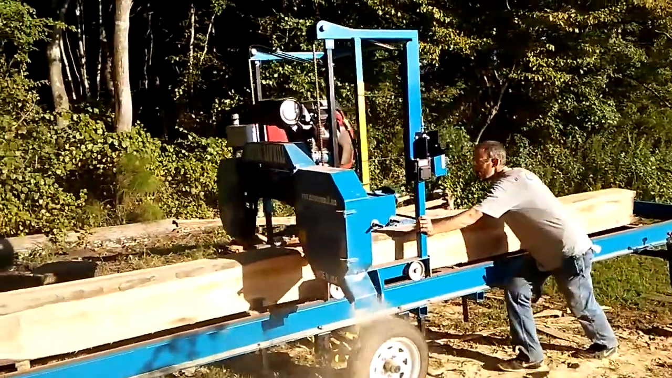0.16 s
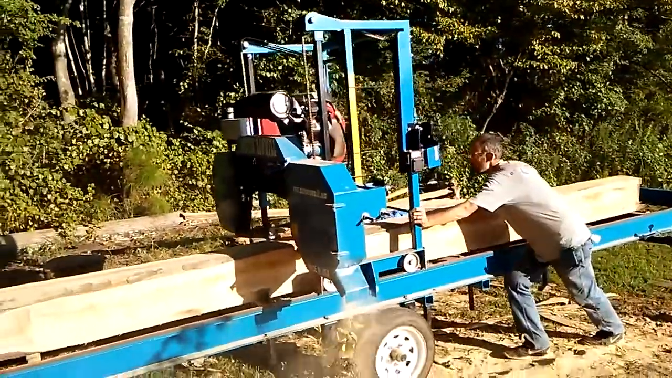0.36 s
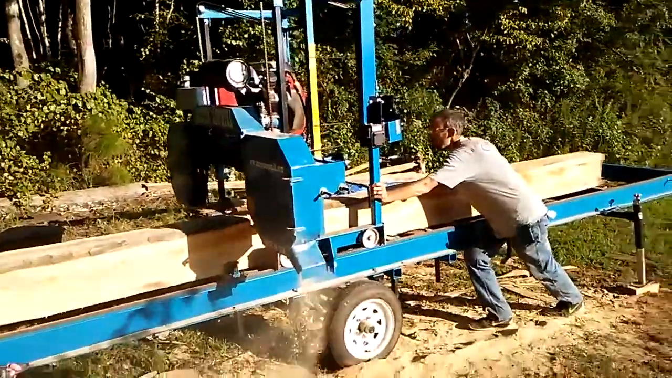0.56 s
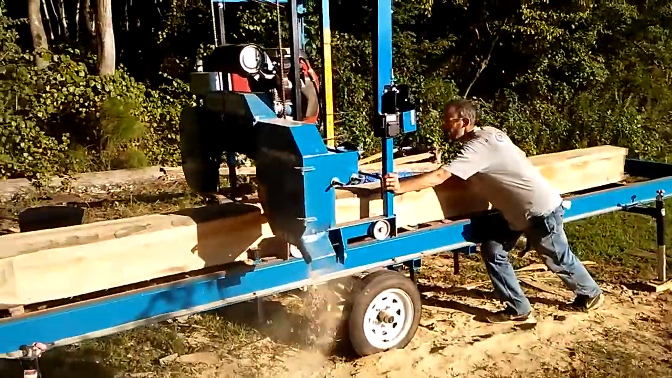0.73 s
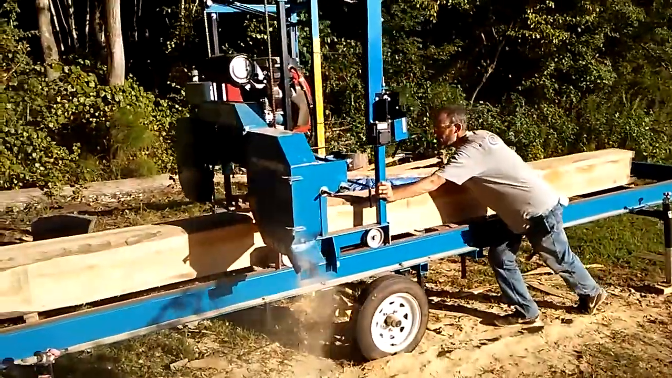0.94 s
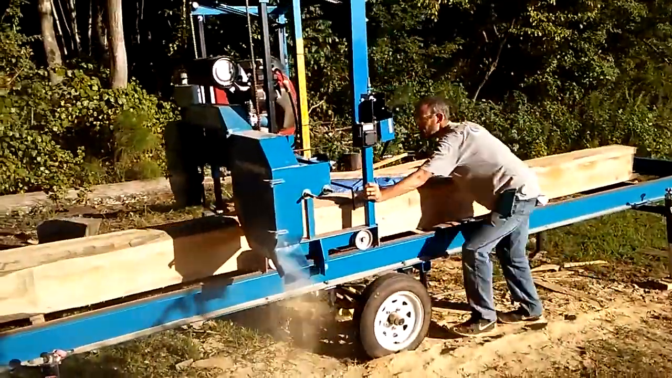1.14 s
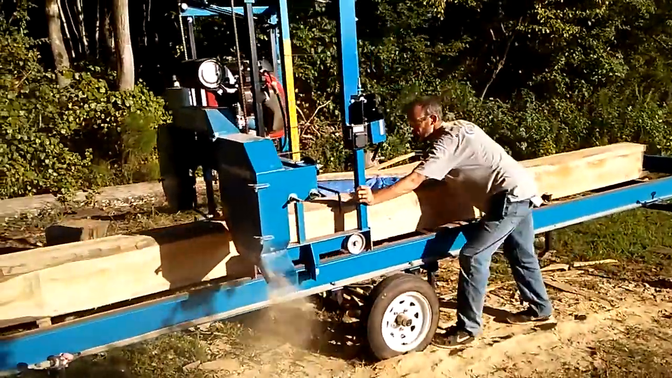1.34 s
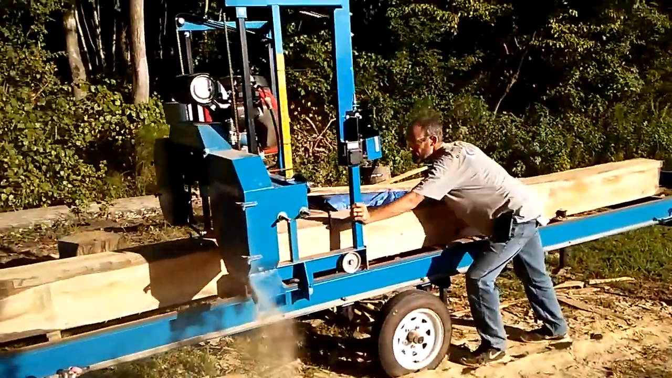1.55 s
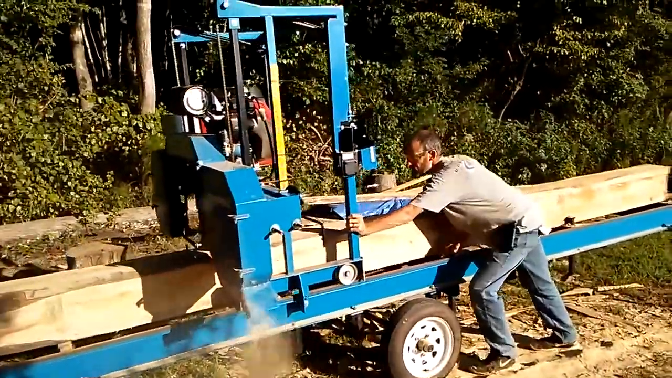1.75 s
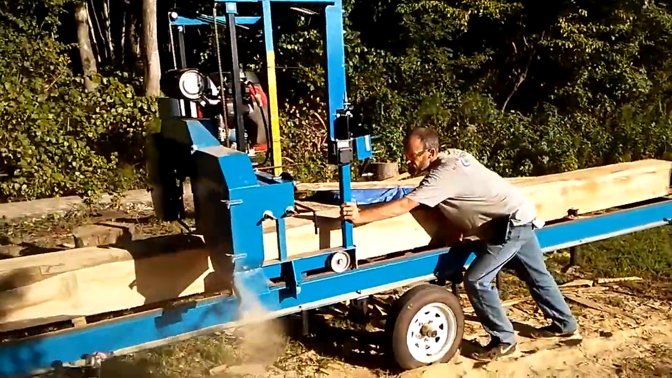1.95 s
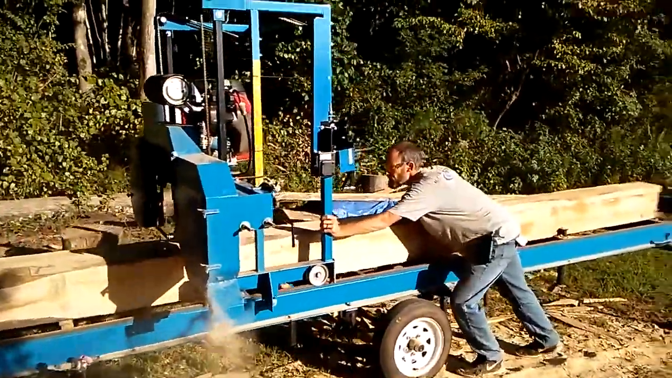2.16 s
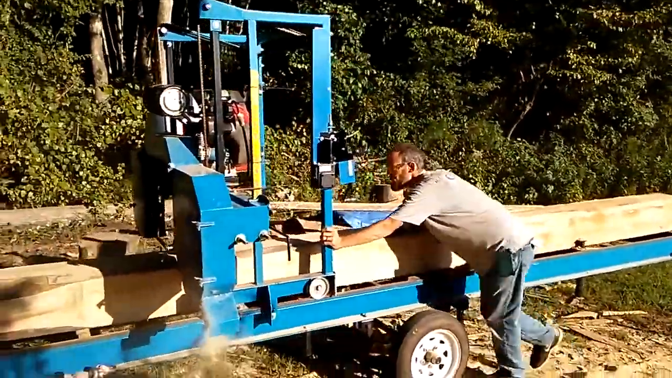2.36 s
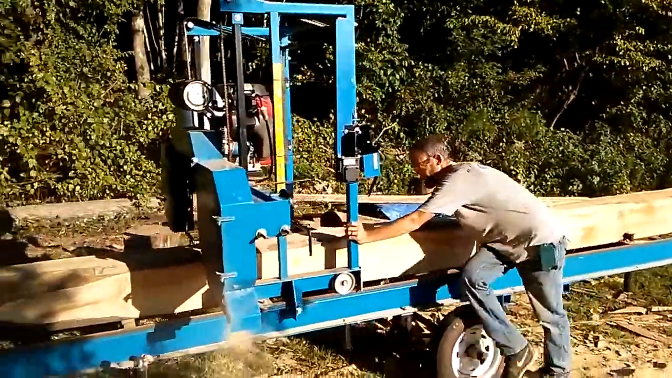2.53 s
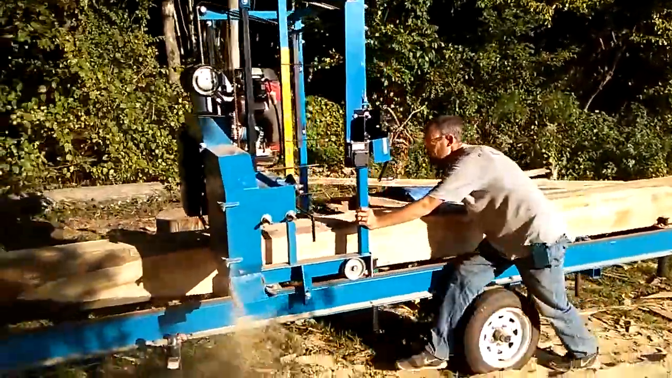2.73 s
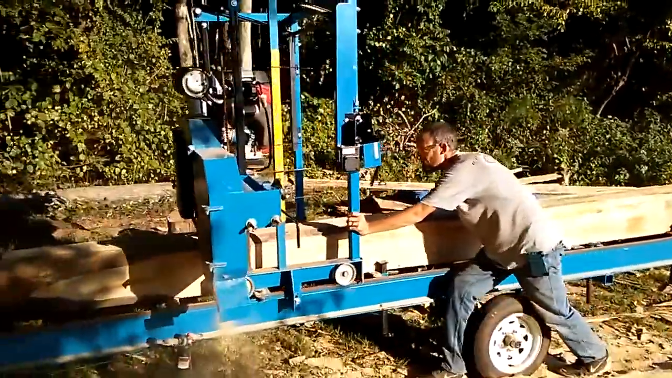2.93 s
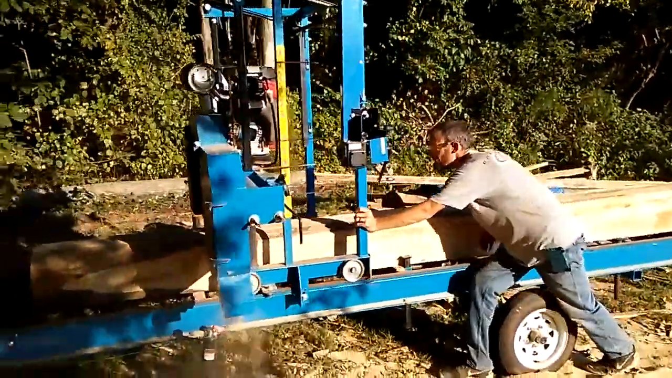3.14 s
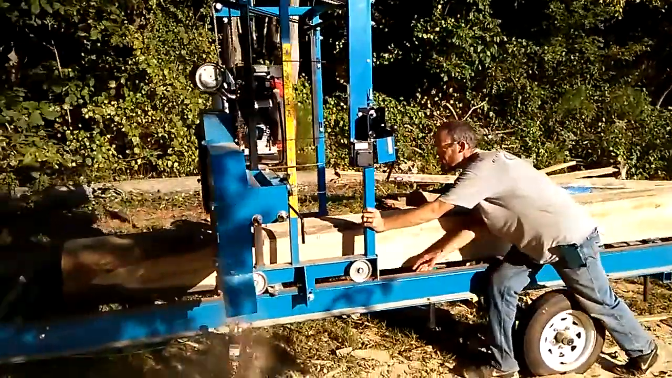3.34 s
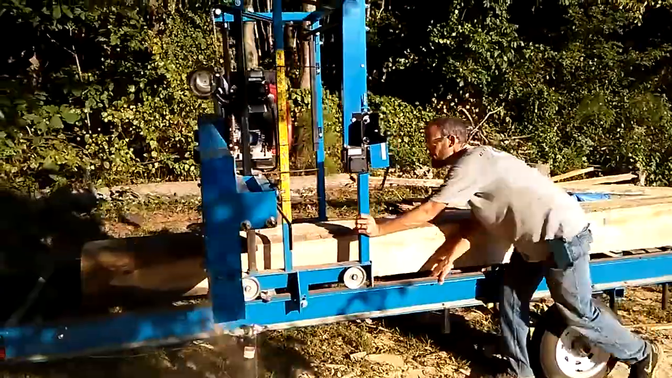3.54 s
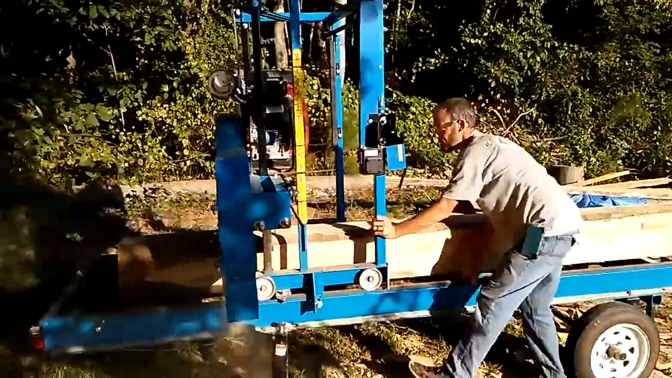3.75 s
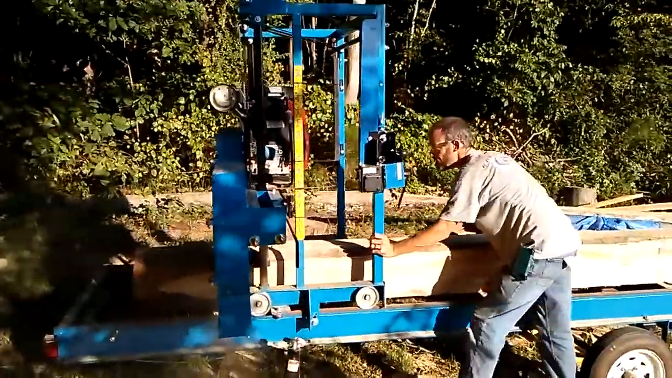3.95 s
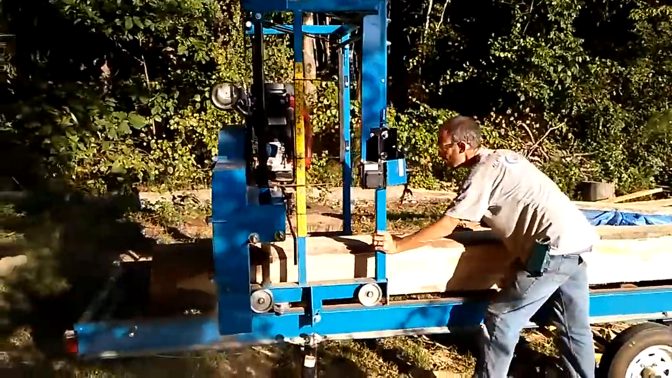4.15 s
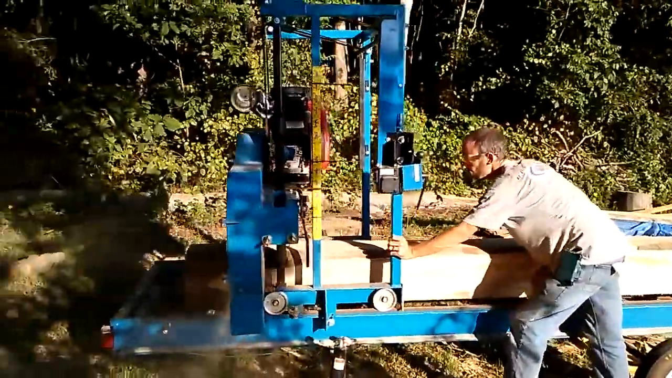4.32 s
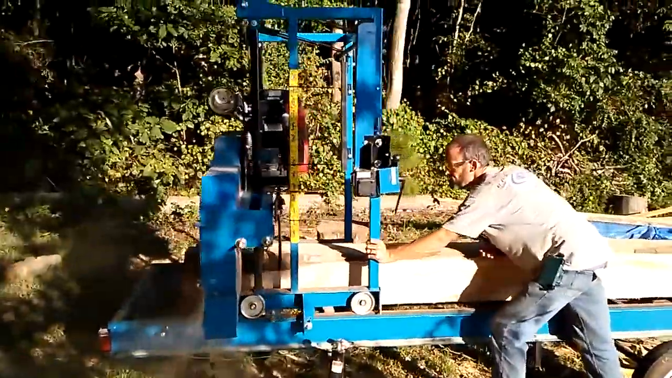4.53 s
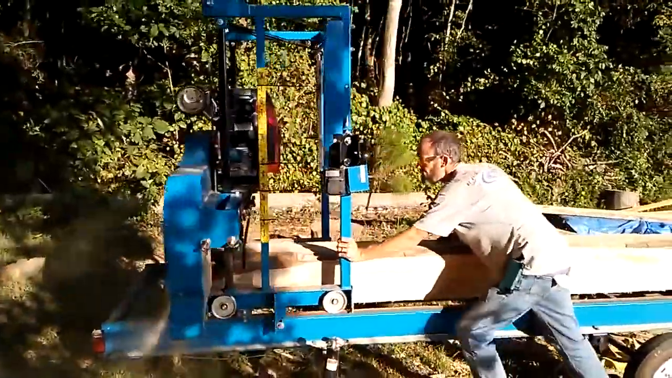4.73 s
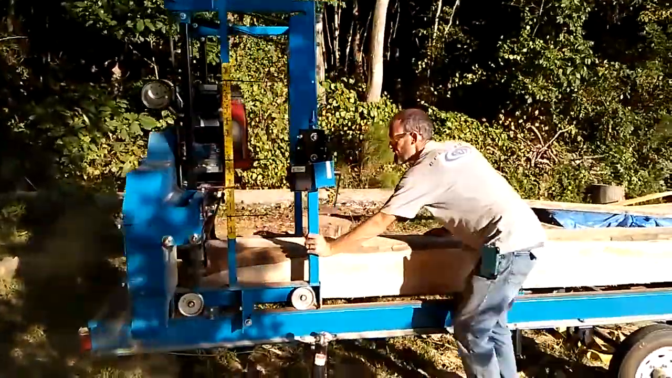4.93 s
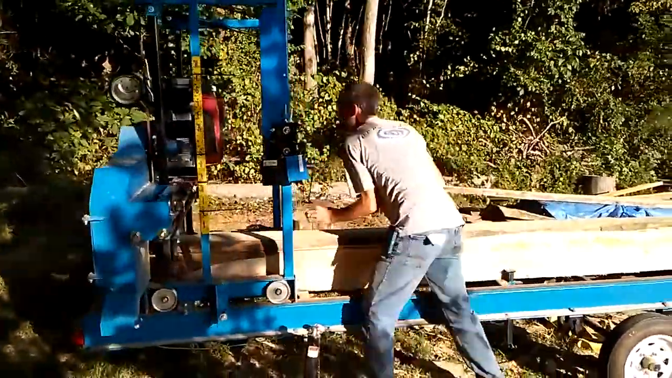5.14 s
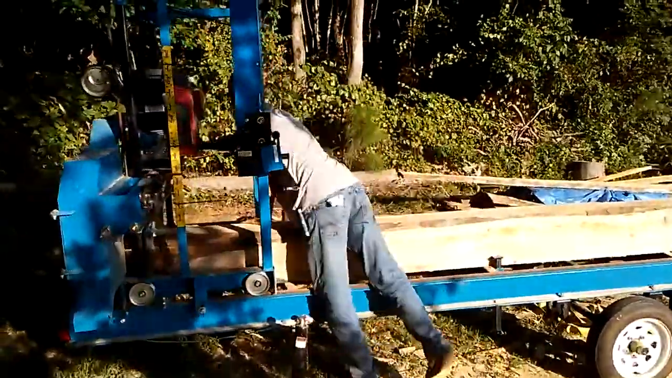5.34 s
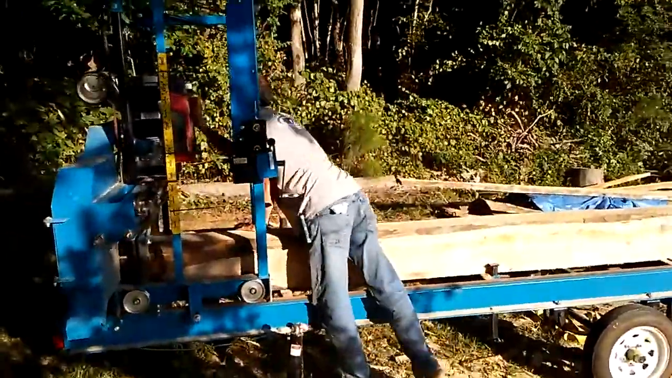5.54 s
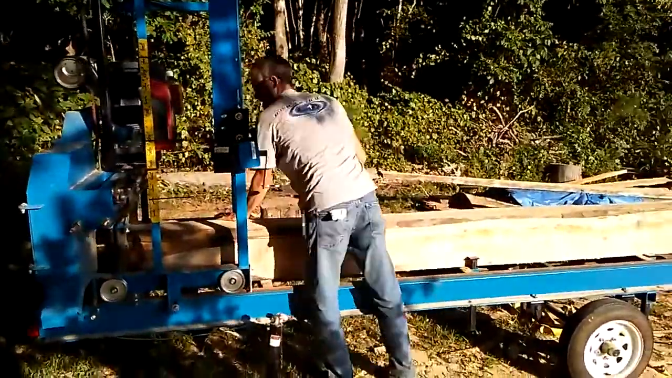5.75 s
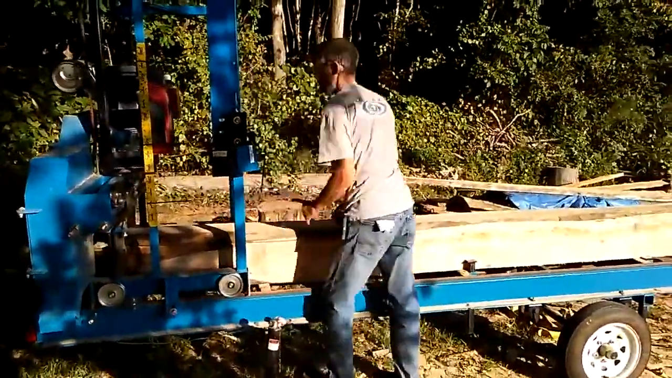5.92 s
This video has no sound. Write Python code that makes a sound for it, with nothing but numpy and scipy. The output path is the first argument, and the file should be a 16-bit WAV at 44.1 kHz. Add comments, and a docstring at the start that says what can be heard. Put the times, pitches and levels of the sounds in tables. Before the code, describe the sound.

Close to a petrol band sawmill outdoors, a loud continuous rasp of teeth in wood and a bright steely sizzle ride over a rough, droning engine. A wavering metallic whine sings through the cut. Near the end the blade leaves the log with two quick squeals, the whine stops, and the engine and rattling housing are left exposed, fading as the throttle is eased. Small microphone, thin bass.

```python
"""The rasp and sizzle of a petrol band sawmill cutting a log outdoors come first, over its droning engine.
The tooth pattern sings on overtones of about 205 Hz, made as sines and narrow resonances; all else but the
squeals is shaped noise. Just before 5 s the blade leaves the wood: the song stops, two brief squeals sound,
then the throttle is eased. Heard close by through a small microphone, with little bass and a notch at 5 kHz."""
import sys
import numpy as np
from scipy import signal
from scipy.io import wavfile
from scipy.ndimage import uniform_filter1d

SR = 44100
rng = np.random.default_rng(int(sys.argv[2]) if len(sys.argv) > 2 else 0)


def bounce(signal):
    """Save signal as a 16-bit WAV file at the path given by the first command-line argument."""
    frames = np.transpose(np.atleast_2d(signal))
    limited = np.clip(frames, -1, 1)
    pcm = np.round(limited * 32767).astype(np.int16)
    wavfile.write(sys.argv[1], SR, pcm)


N = 268260
T = np.arange(N) / SR


def amp(db):
    """Amplitude factor of a level in dB."""
    return 10 ** (np.asarray(db) / 20)


def unit(x):
    """Scale to rms 1."""
    return x / np.sqrt(np.mean(x ** 2) + 1e-20)


def column(rows, index, t=T):
    """One column of a table, drawn as straight lines between its times."""
    rows = np.asarray(rows)
    return np.interp(t, rows[:, 0], rows[:, index])


def cycle(turns):
    """Cosine that peaks once per turn."""
    return np.cos(2 * np.pi * turns)


def wander(width):
    """Slow chance of rms 1, smoothed twice over width seconds."""
    size = max(int(width * SR), 2)
    once = uniform_filter1d(rng.standard_normal(N), size)
    return unit(uniform_filter1d(once, size))


def noise(shape, later=None, share=None, patchy_db=0.5, span_hz=400, span_s=.06, size=1024, side=None):
    """Random short-time spectra of rms 1 with drifting patches; shape may blend into a later one."""
    hop = size // 4
    frames = N // hop + 5
    hz = np.fft.rfftfreq(size, 1 / SR)

    def read(points):
        point_hz, db = np.transpose(points)
        return np.interp(np.log(hz + 1), np.log(point_hz + 1), db)[:, None]

    real, imag, patches = rng.standard_normal((frames, len(hz), 3)).T
    patches = uniform_filter1d(patches, max(int(span_hz * size / SR), 1), axis=0)
    patches = unit(uniform_filter1d(patches, max(int(span_s * SR / hop), 1), axis=1))
    level = read(shape) + 0 * real
    if later:
        mix = np.clip(column(share, index=1, t=np.arange(frames) * hop / SR), 0, 1)
        level = (1 - mix) * level + mix * read(later)
    gain = amp(level) * (hz > .9 * shape[0][0])[:, None]
    gain = gain / np.sqrt((gain ** 2).sum(axis=0)) * amp(patchy_db * patches)
    spectra = (gain * (real + 1j * imag))[None]
    if side:
        side_real, side_imag, gaps = rng.standard_normal((frames, len(hz), 3)).T
        gaps = uniform_filter1d(gaps, 16, axis=0)
        gaps = unit(uniform_filter1d(gaps, 6, axis=1))  # the width comes and goes
        apart = gain * amp(read(side) + 6.9 * gaps) * (side_real + 1j * side_imag)
        spectra = np.array([spectra[0] + apart, spectra[0] - apart])
    out = signal.istft(spectra, nperseg=size, noverlap=size - hop)[1][:, :N]
    return out / np.sqrt(np.mean(out.mean(axis=0) ** 2))


def resonate(hz, width):
    """Noise through a narrow resonance that follows hz: smooth complex noise shifted up; rms 1."""
    decay = np.exp(-np.pi * width / SR)
    white = rng.standard_normal(N) + 1j * rng.standard_normal(N)
    slow = signal.lfilter([1 - decay], [1, -decay], white)
    carrier = np.exp(2j * np.pi * np.cumsum(hz * np.ones(N)) / SR)
    return unit((slow * carrier).real)


def engine_firings():
    """Running count of firings, with an uneven rate around 59.9 Hz."""
    return np.cumsum(59.9 * (1 + 0.1507 * wander(0.0318))) / SR


# Engine levels. Each row: time in seconds, exhaust in dB, casing in dB, rumble in dB.
ENGINE_LEVELS = [(0, -27.5, -26.5, -51), (.6, -26.5, -22.5, -48), (1.4, -28, -25, -51),
                 (1.9, -25, -24.5, -50), (2.4, -26.5, -26, -50), (3.2, -25, -22, -50),
                 (4.3, -26, -25.5, -54), (4.9, -27, -22.5, -49), (5.17, -24.5, -19, -46.5),
                 (5.45, -25.5, -21, -49), (5.62, -26.5, -20.5, -37), (5.8, -30, -24, -45),
                 (6.08, -35, -28.5, -56)]
# Low engine rumble spectrum. Each row: frequency in Hz, relative density in dB.
RUMBLE_SPECTRUM = [(12, -37), (20, 0), (54, 3), (70, 8.5), (107, -9), (125, -7), (160, -32), (280, -120)]


def engine_rumble(shake):
    """Low engine noise that wavers with the frame."""
    level_db = column(ENGINE_LEVELS, index=3) + 1.7 * wander(.04) + .8 * shake
    return amp(level_db) * noise(RUMBLE_SPECTRUM, size=4096, span_hz=30, span_s=.15)


# Blade leaving the log. Each row: time in seconds, share (0-1) of the free-running spectra.
OUT_OF_WOOD = [(0, 0), (4.88, 0.35), (5.0, 0.7), (6.08, 0.73)]
# Exhaust spectra, in the wood and free. Each row: frequency in Hz, relative density in dB.
EXHAUST_CUTTING = [(65, -58), (110, -37), (153, -11), (237, 1), (303, -2), (355, -14.5), (403, -5),
                   (449, -13), (500, -10.5), (650, -33), (1100, -120)]
EXHAUST_FREE = [(65, -50), (110, -23), (151, -30), (177, -15.5), (237, -4), (269, -9), (360, 0), (500, -23),
                (650, -45), (1100, -120)]


def exhaust(firings, shake):
    """Rough noise puffs, one per firing, throbbing once per turn of the band wheel."""
    wheel_hz, throb_db = 5.7, 1.1
    puffs = 1 + 0.18 * cycle(firings)
    throb = amp(throb_db * cycle(wheel_hz * (T - .06)) + 1.5 * shake)
    rough = noise(EXHAUST_CUTTING, EXHAUST_FREE, OUT_OF_WOOD, size=4096, span_hz=60, span_s=.1)
    return amp(column(ENGINE_LEVELS, index=1)) * unit(puffs * throb * rough)


# Sheet metal spectra, in the wood and free. Each row: frequency in Hz, relative density in dB.
CASING_CUTTING = [(280, -52), (480, -17.5), (604, -4.5), (819, -6.5), (935, -8.5), (1000, -7), (1110, -8),
                  (1290, -5), (1350, -9), (1380, 0.5), (1790, -24), (3040, -120)]
CASING_FREE = [(280, -30), (480, -7), (538, -15.5), (578, -8), (657, -15.5), (711, -6), (841, -6),
               (1060, 3), (1180, 0.5), (1380, -18), (1790, -43), (3040, -120)]


def engine_casing(firings, shake):
    """Sheet metal rattles as noise that swells with each firing."""
    rattle = noise(CASING_CUTTING, CASING_FREE, OUT_OF_WOOD, patchy_db=0.4, span_hz=80, span_s=0.063, size=2048)
    level_db = column(ENGINE_LEVELS, index=2) + 0.56 * wander(0.03) + 1.08 * shake
    return amp(level_db) * unit((1 + 0.23 * cycle(firings)) * rattle)


# Housing resonances. Each row: frequency in Hz, width in Hz, first level in dB, last level in dB.
HOUSING_HUMS = [(1068, 47, -31.5, -24.5), (1736, 27, -27.5, -39)]


def housing_hums():
    """Narrow resonances of the housing hum once the blade runs free."""
    free_s, rise_s = 4.95, 0.065
    hum = 0
    for hz, width, first_db, last_db in HOUSING_HUMS:
        level_db = np.interp(T, (free_s, T[-1]), (first_db, last_db)) + 4.1 * wander(.04)
        hum = hum + amp(level_db) * resonate(hz, width)
    return hum * np.clip((T - free_s) / rise_s, 0, 1)


# Squeals as the blade slips out. Each row: start in seconds, length in seconds, frequency in Hz, level in dB.
SQUEALS = [(4.835, 0.084, 2080, -26.5), (4.912, 0.049, 2010, -22.5)]


def squeals():
    """The slipping blade squeals: short sines with soft edges."""
    total = 0
    for start, length, hz, db in SQUEALS:
        swell = np.sin(np.pi * np.clip((T - start) / length, 0, 1))
        total = total + amp(db) * np.sqrt(2) * np.sin(2 * np.pi * hz * T) * swell
    return total


# Tooth pattern, sagging and recovering with the load. Each row: time in seconds, rate in Hz.
TOOTH_RATE = [(0, 203.8), (.42, 207.8), (.58, 205.2), (.7, 206.6), (.85, 203), (1.0, 203.8), (1.25, 201.6),
              (1.45, 203.8), (1.75, 206), (2.05, 203.7), (2.4, 206), (2.8, 198.6), (3.0, 204),
              (3.35, 201.5), (3.5, 203), (3.62, 208), (3.85, 203.2), (4.05, 208.4), (4.3, 202.8),
              (4.48, 206.3), (4.72, 205.4), (4.82, 208)]


def tooth_turns():
    """Count of tooth groups gone by, with a slight unevenness."""
    return np.cumsum(column(TOOTH_RATE, index=1) * (1 + 0.00211 * wander(0.023))) / SR


# The strong overtones, as multiples of the tooth rate.
STRONG_OVERTONES = (7, 13, 14)
# Their levels. Each row: time in seconds, then the level of each strong overtone in dB.
SONG_LEVELS = [(0, -30, -21, -29), (.25, -22, -23, -26), (.7, -29, -25.5, -21), (.92, -38, -22, -35),
               (1.15, -26.5, -25, -22.5), (1.4, -37, -39, -28), (1.65, -33, -38, -27.5),
               (1.95, -30, -33, -23.5), (2.2, -33, -39, -29), (2.45, -26, -36, -31), (2.8, -32, -38, -23.5),
               (2.98, -15.5, -30, -27), (3.15, -27, -39, -32), (3.4, -27, -51, -21), (3.6, -23, -23, -27),
               (3.82, -15, -41, -37), (4.05, -22.5, -25.5, -29), (4.2, -16.5, -38, -30),
               (4.7, -18.5, -38, -32)]
# Faint overtones. Each row: multiple of the tooth rate, level in dB, gain in dB as the rasp sharpens.
FAINT_OVERTONES = [(4, -36.5, 1.5), (5, -37.5, 9.5), (8, -40, 3), (9, -35, -1), (10, -38, 0),
                   (12, -41.5, -7), (15, -47, -5), (17, -36, 2), (18, -34, 7.5)]
# Rasp gathering near 3.7 kHz. Each row: time in seconds, share (0-1) of the sharp rasp.
SHARPNESS = [(0, 0.04), (1.9, 0.05), (2.3, 0.87), (3.5, 0.98), (5.5, 1), (5.65, 0.1), (6.08, 0.35)]


def song(turns):
    """The tooth rate sings in fluttering sines and rough resonances, fading as the blade comes free."""
    end_s, fade_s = 4.79, .04
    total = 0
    for i, (multiple, flutter_db) in enumerate(zip(STRONG_OVERTONES, (1.1, 2.2, 2.2))):
        flutter = amp(flutter_db * wander(0.012) + 2.18 * wander(0.065))
        tone = np.sqrt(2) * np.sin(2 * np.pi * (multiple * turns + rng.random()))
        total = total + amp(column(SONG_LEVELS, index=i + 1)) * flutter * tone
    for multiple, db, gained_db in FAINT_OVERTONES:
        level_db = db + gained_db * column(SHARPNESS, index=1) + 2.8 * wander(0.11)
        total = total + amp(level_db) * resonate(round(multiple) * column(TOOTH_RATE, index=1), 19.5)
    return total * np.clip((end_s - T) / fade_s, 0, 1)


# Levels of the cut. Each row: time in seconds, log and frame in dB, rasp in dB, sizzle in dB.
CUT_LEVELS = [(0, -28.5, -19, -17.5), (.6, -29, -17.5, -18), (1.25, -37, -18.5, -17.5),
              (1.4, -32, -19, -15), (1.85, -24.5, -18, -18), (2.3, -21.5, -20, -12.5),
              (2.6, -20.5, -17.5, -18.5), (3.2, -18.5, -16.5, -22.5), (4.0, -22.5, -17, -19.5),
              (4.88, -21, -17, -17.5), (4.96, -21, -23, -15.5), (5.1, -23, -20, -24.5),
              (5.52, -23, -21, -24.5), (5.65, -22.5, -25, -32), (6.08, -30, -27.5, -38)]
# Log and frame spectra, in the wood and free. Each row: frequency in Hz, relative density in dB.
LOG_CUTTING = [(800, -24), (1360, -1.5), (1440, 1.5), (1580, -1.5), (1720, -7.5), (1850, -8.5), (2150, -17),
               (2300, -23), (2990, -36), (5060, -120)]
LOG_FREE = [(800, -42), (1360, -19), (1400, -7.5), (1490, -5), (1730, 0.5), (2050, -5.5), (2220, -13),
            (2300, -29), (2990, -49), (5060, -120)]


def log_and_frame(shake):
    """Log and frame sound as patchy noise strongest near 1.5 kHz."""
    body = noise(LOG_CUTTING, LOG_FREE, OUT_OF_WOOD, patchy_db=2.5, span_hz=90, span_s=0.09, size=2048)
    return amp(column(CUT_LEVELS, index=1) + 1.4 * shake) * body


def tooth_bite(turns):
    """The teeth bite at the tooth rate, less deeply as the blade leaves the wood."""
    return 1 + 0.11 * cycle(turns) * (1 - column(OUT_OF_WOOD, index=1))


# Rasp spectra, broad and sharp. Each row: frequency in Hz, relative density in dB.
RASP_BROAD = [(1320, -12), (2250, -8), (2580, -2), (2780, -2), (2950, -3.5), (3260, -7), (3850, -2),
              (4110, -7.5), (4390, -28), (4520, -52), (4800, -91), (4900, -91), (5000, -53), (6500, -80),
              (11000, -120)]
RASP_SHARP = [(1320, -67), (2250, -15), (2330, -7), (2440, -7), (2790, -0.5), (3260, -1.5), (3690, 3.5),
              (3890, 2.5), (4060, -0.5), (4150, -13), (4260, -13), (4480, -31), (5000, -55), (6500, -60),
              (11000, -120)]


def rasp(bite, shake):
    """Teeth scrape the wood: noise in bursts at the tooth rate."""
    scrape = noise(RASP_BROAD, RASP_SHARP, SHARPNESS, patchy_db=2.5, span_hz=120, span_s=.025)
    level_db = column(CUT_LEVELS, index=2) + 0.39 * wander(0.039) + 1.3 * shake
    return amp(level_db) * unit(bite * scrape)


# Stereo width of the treble, before it drifts. Each row: frequency in Hz, side against mid in dB.
TREBLE_WIDTH = [(4000, -54), (8600, -69), (9200, -11), (10500, -7.5), (15000, -7)]
# Top treble spectrum. Each row: frequency in Hz, relative density in dB.
TOP_SPECTRUM = [(5290, -22.5), (9000, -0.5), (12800, -7.5), (14300, -17), (15600, -38)]


def top_treble(shake):
    """The top treble flickers in patchy noise, following the set sizzle level by a share."""
    base_db, follows = -13, 0.65
    flicker = noise(TOP_SPECTRUM, patchy_db=5.5, span_hz=700, span_s=.03, side=TREBLE_WIDTH)
    level_db = base_db + follows * column(CUT_LEVELS, index=3) + 1.4 * wander(0.066) + 2.2 * shake
    return amp(level_db) * flicker


# Sizzle spectra, cutting and with throttle eased. Each row: frequency in Hz, relative density in dB.
SIZZLE_CUTTING = [(2880, -71), (4900, -43.5), (6380, -13.5), (6720, -7), (7440, -1), (7770, 2.5),
                  (9100, -9), (11800, -18.5), (20000, -120)]
SIZZLE_EASED = [(2880, -59), (4900, -37), (7130, -2.5), (7570, -1.5), (8690, 0), (8780, -14), (9100, 4.5),
                (11800, -32), (20000, -120)]
# Easing of the throttle. Each row: time in seconds, share (0-1) of the eased sizzle.
THROTTLE_EASED = [(0, 0.24), (5.0, 0.12), (5.5, 0), (5.65, 0.9), (6.08, 0.6)]
# Blade modes. Each row: frequency in Hz, width in Hz, level against the sizzle in dB.
BLADE_MODES = [(6990, 22, -17), (7540, 54, -7.5), (7500, 28, -9), (8670, 80, -11.5)]
# Brief dips of the sizzle, and one flare. Each row: centre in seconds, change in dB.
SIZZLE_DIPS = [(.45, -9), (.72, -5.5), (1.9, -2.5), (2.38, -6), (3.01, -9), (3.35, -4), (3.47, -5),
               (4.17, 5), (4.34, -8), (5.0, -14), (5.19, -4), (5.33, -8), (5.58, -7), (5.66, -11),
               (5.88, -13)]


def sizzle(bite, shake):
    """The steel band sizzles as treble noise in tooth bursts and rings on its own modes."""
    dip_s = 0.024
    hiss = noise(SIZZLE_CUTTING, SIZZLE_EASED, THROTTLE_EASED, patchy_db=2.5, span_hz=150, span_s=.024,
                 side=TREBLE_WIDTH)
    rings = sum(amp(db + 4.7 * wander(0.092)) * resonate(hz, width) for hz, width, db in BLADE_MODES)
    dips_db = sum(db * np.exp(-((T - centre) / dip_s) ** 2) for centre, db in SIZZLE_DIPS)
    level_db = column(CUT_LEVELS, index=3) + dips_db + 0.94 * wander(0.051) + 1.47 * shake
    return amp(level_db) * (unit(bite * hiss) + rings)


def scene():
    """Engine, blade and cut share one judder of the frame."""
    turns = tooth_turns()
    firings = engine_firings()
    bite = tooth_bite(turns)
    shake = wander(0.0058)  # the whole frame judders, swaying its noises together
    engine = engine_rumble(shake) + exhaust(firings, shake) + engine_casing(firings, shake) + housing_hums()
    blade = squeals() + song(turns)
    cut = log_and_frame(shake) + rasp(bite, shake) + top_treble(shake) + sizzle(bite, shake)
    return engine + blade + cut


# Microphone notch near 5 kHz. Each row: frequency in Hz, response in dB.
MICROPHONE_NOTCH = [(4000, 0), (4300, -3.5), (4600, -7.5), (5000, -27), (5300, -1.5)]


def record(dry):
    """The input stage rounds off the tallest peaks; microphone notch; then the band limit."""
    ceiling, edge_hz = 1.2, 15750
    mid = dry.mean(axis=0)
    rounded = ceiling * np.tanh(mid / ceiling) + dry - mid  # only the mid is rounded
    hz, db = np.transpose([(0, 0.0084)] + MICROPHONE_NOTCH + [(SR / 2, 0)])
    notch = signal.firwin2(1023, hz, amp(db), fs=SR)
    notched = signal.oaconvolve(rounded, notch[None], "same")
    band = signal.firwin(1023, edge_hz, window=("kaiser", 9), fs=SR)
    return signal.oaconvolve(notched, band[None], "same")


dry = scene()
out = record(dry)
bounce(out)
```